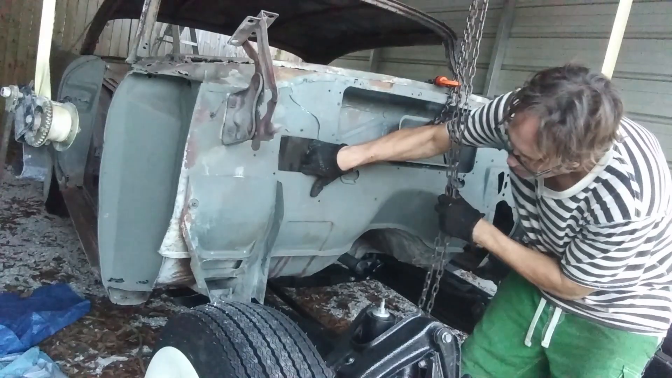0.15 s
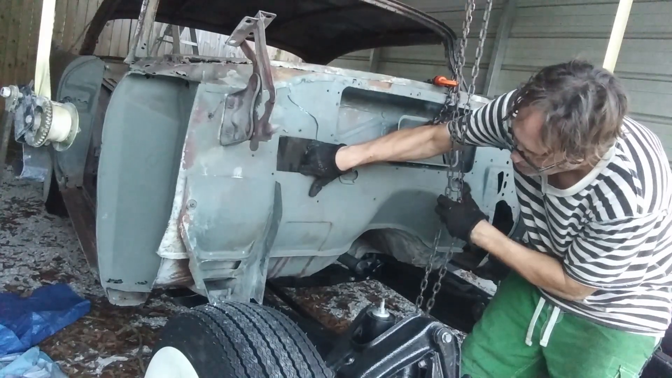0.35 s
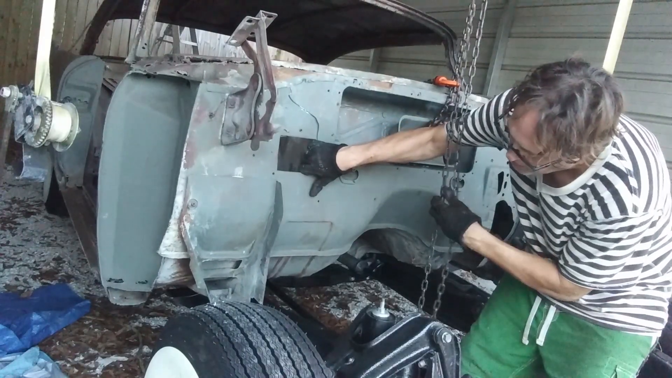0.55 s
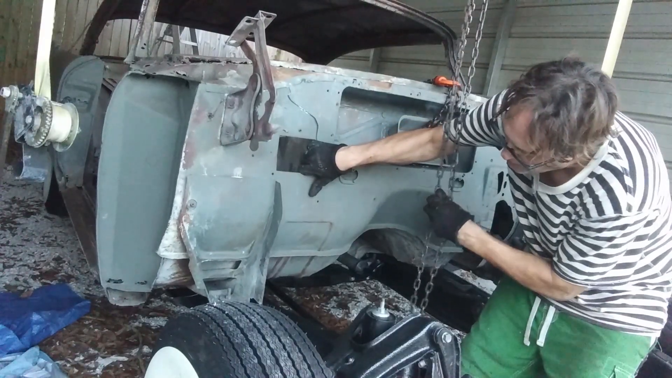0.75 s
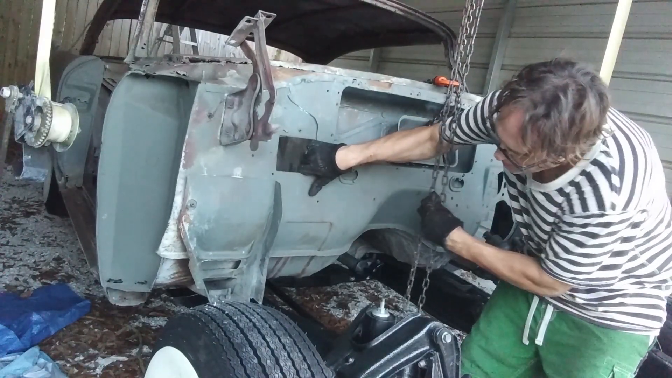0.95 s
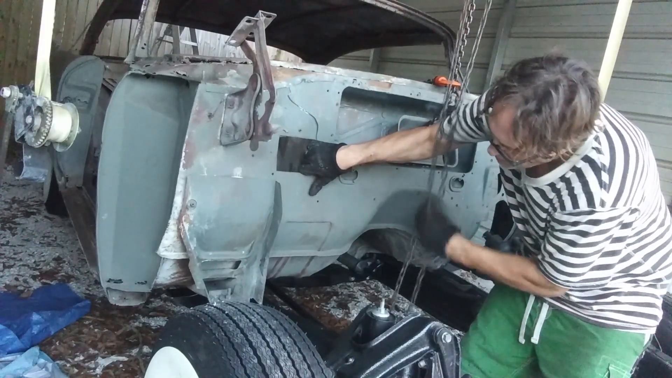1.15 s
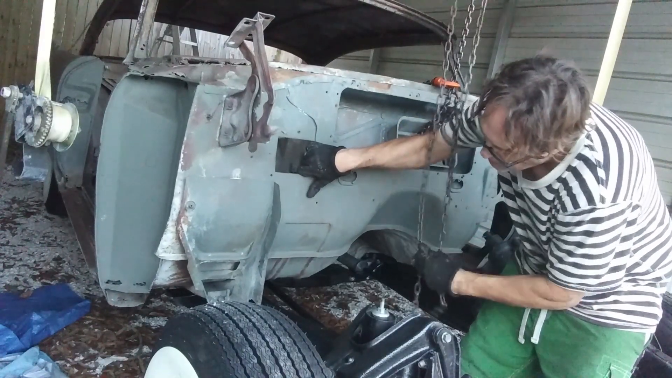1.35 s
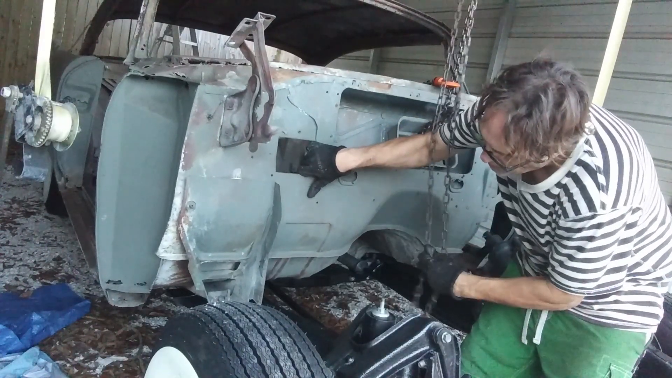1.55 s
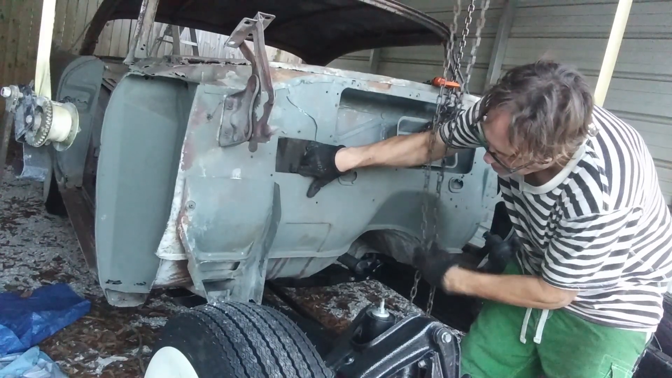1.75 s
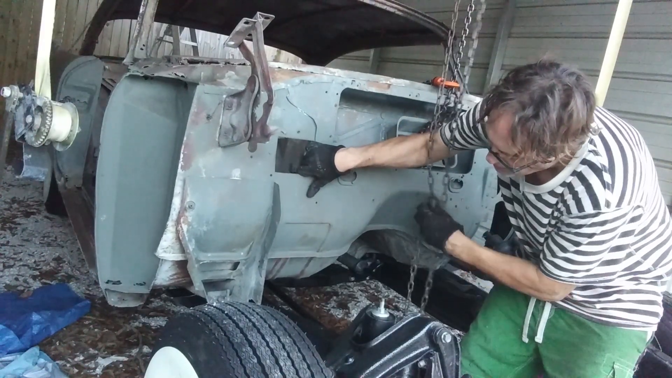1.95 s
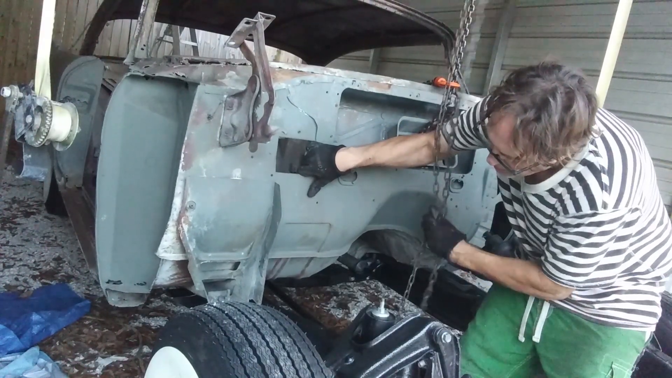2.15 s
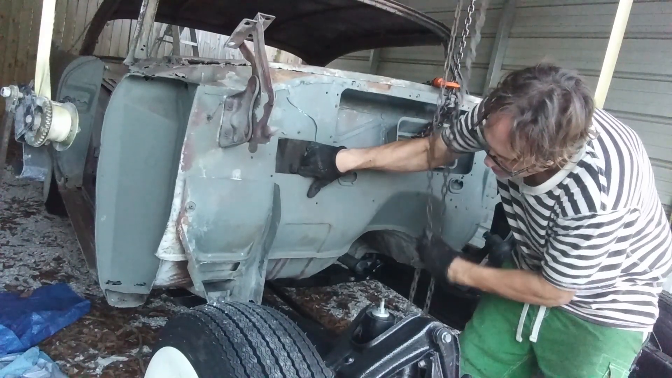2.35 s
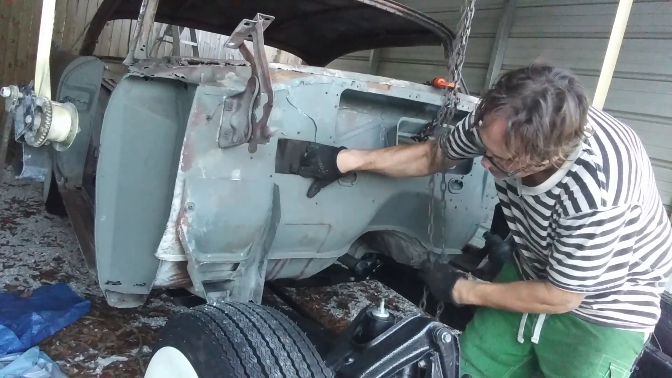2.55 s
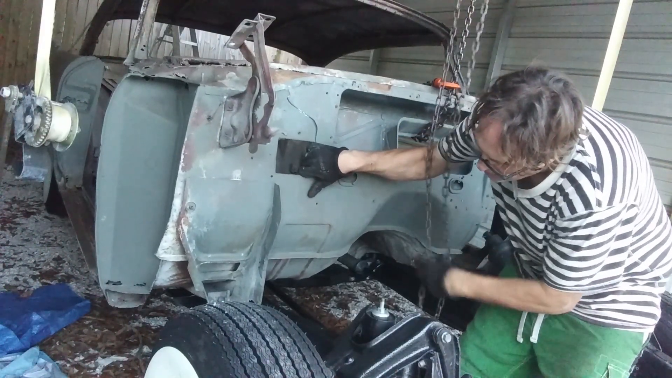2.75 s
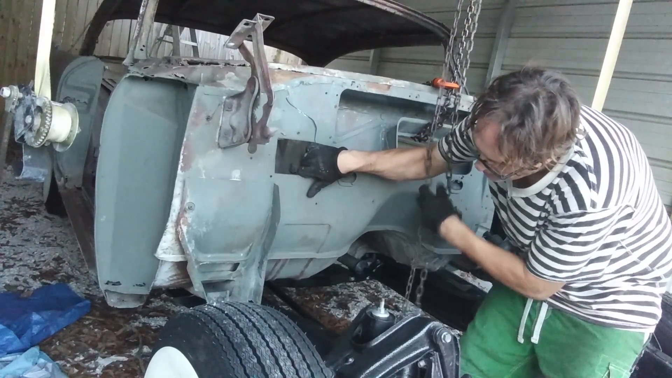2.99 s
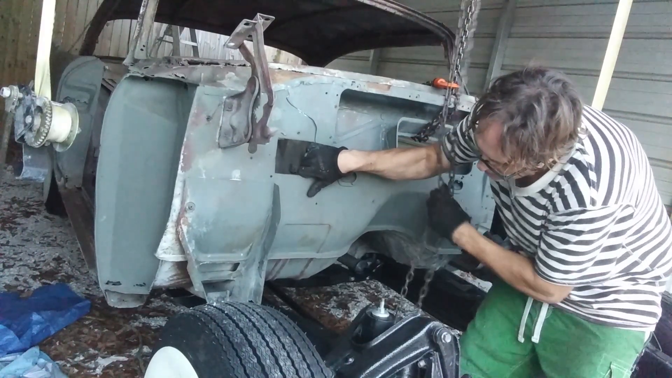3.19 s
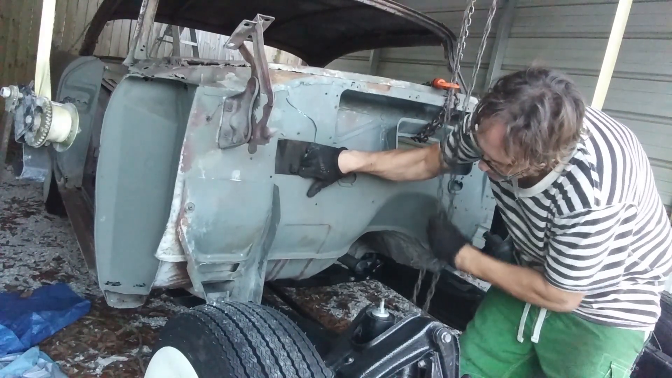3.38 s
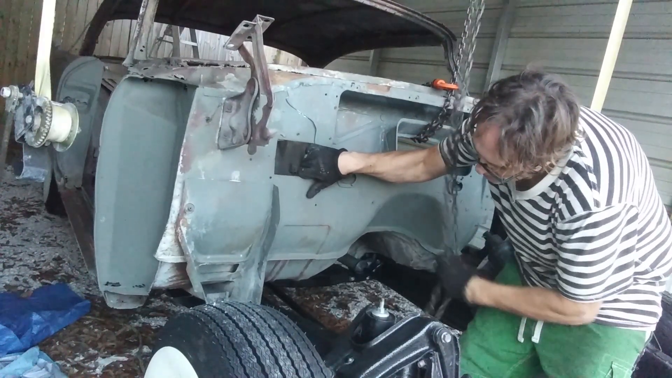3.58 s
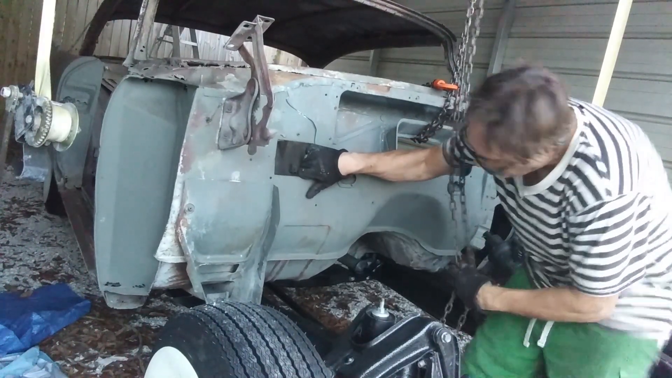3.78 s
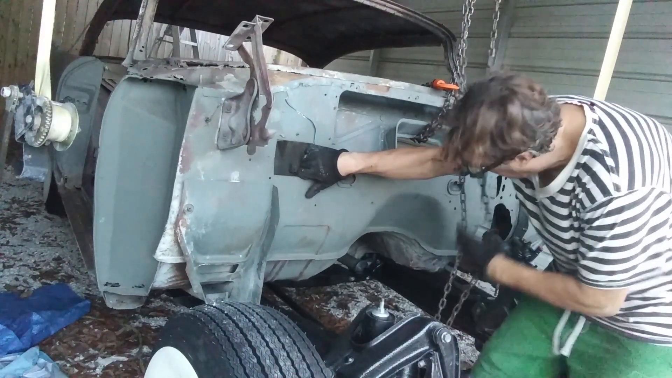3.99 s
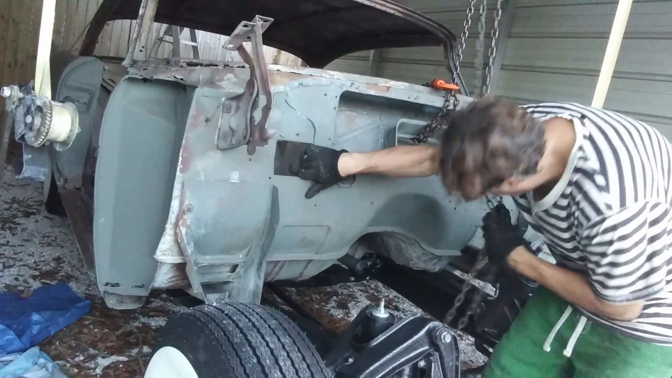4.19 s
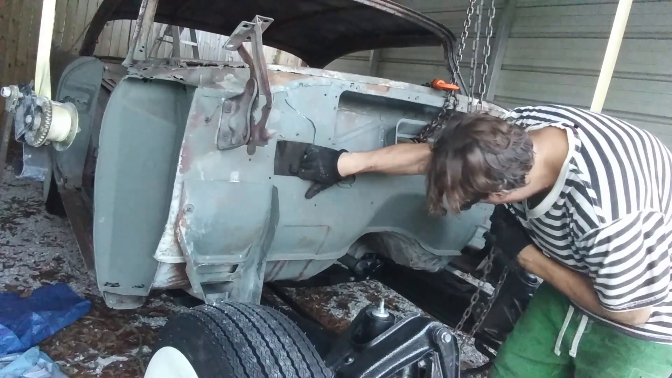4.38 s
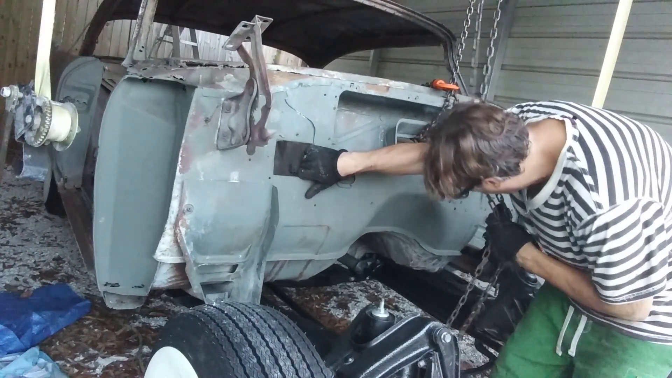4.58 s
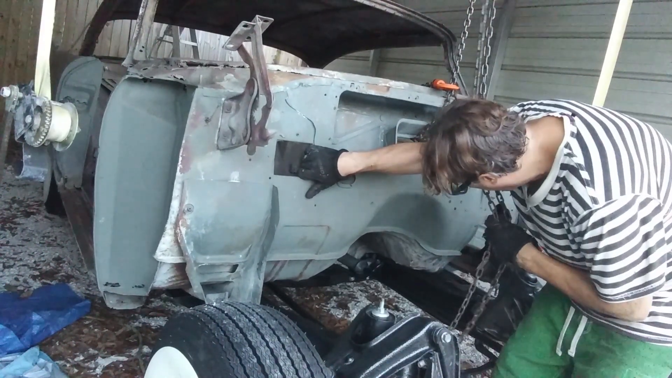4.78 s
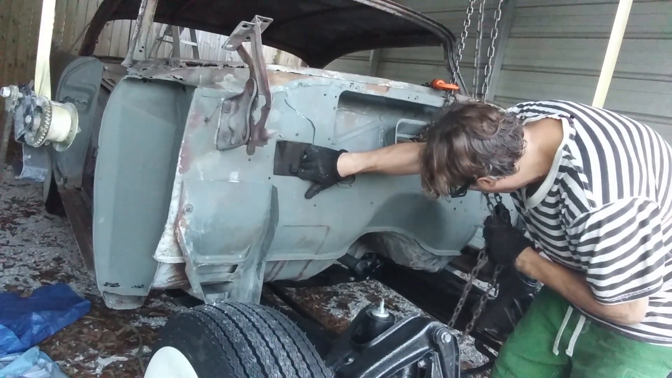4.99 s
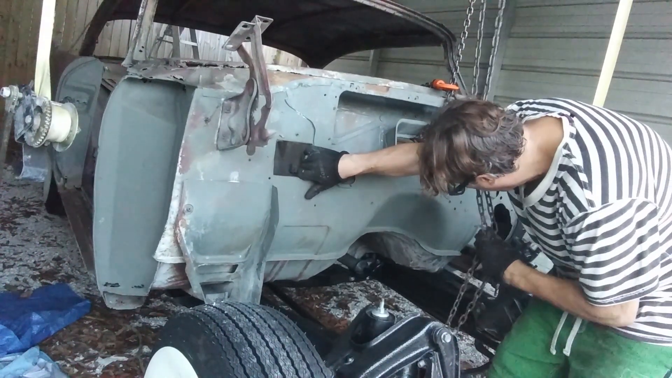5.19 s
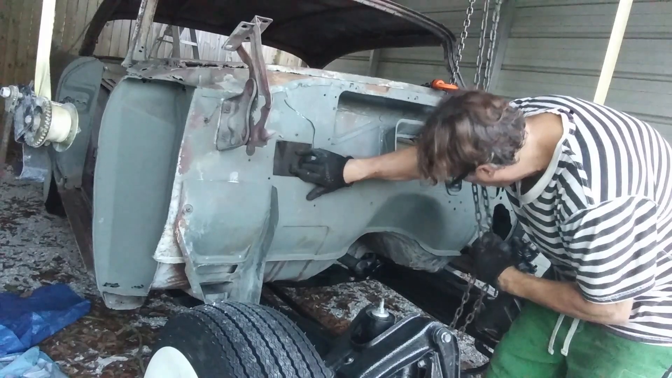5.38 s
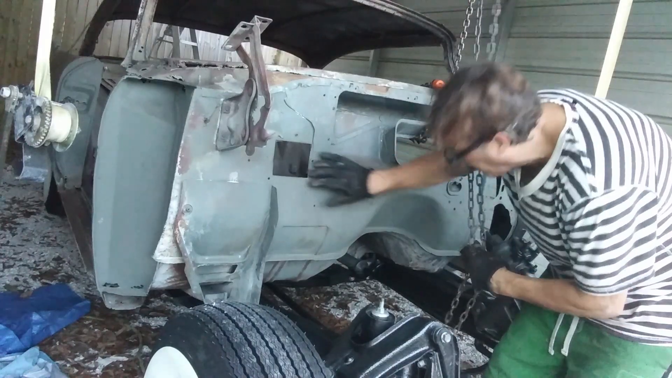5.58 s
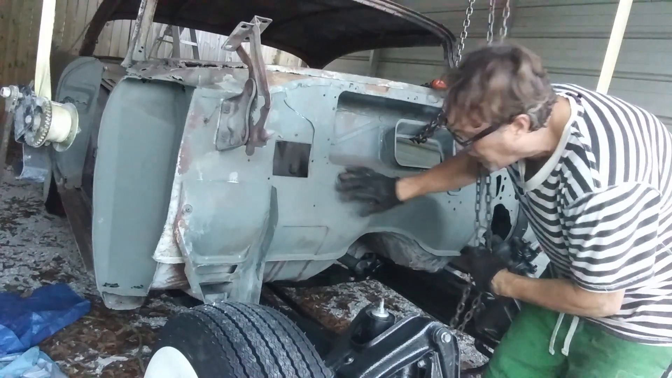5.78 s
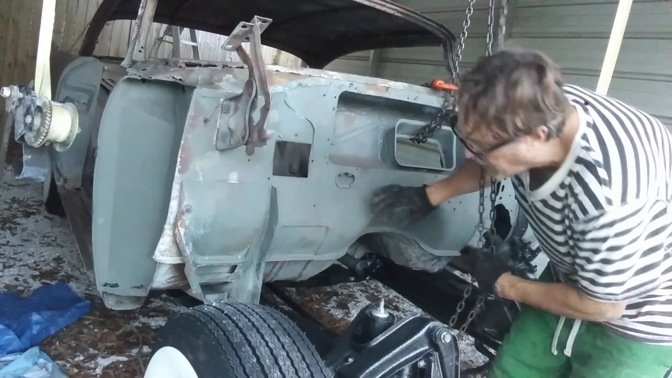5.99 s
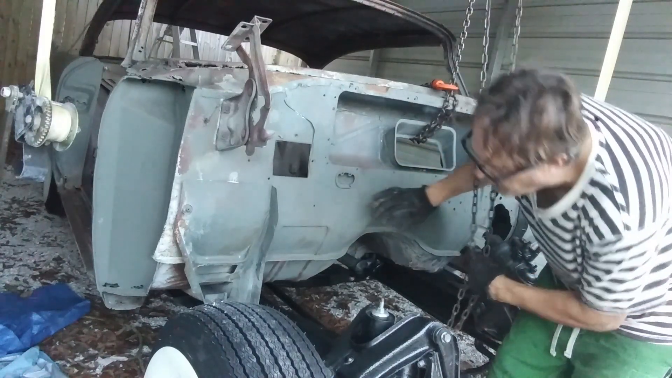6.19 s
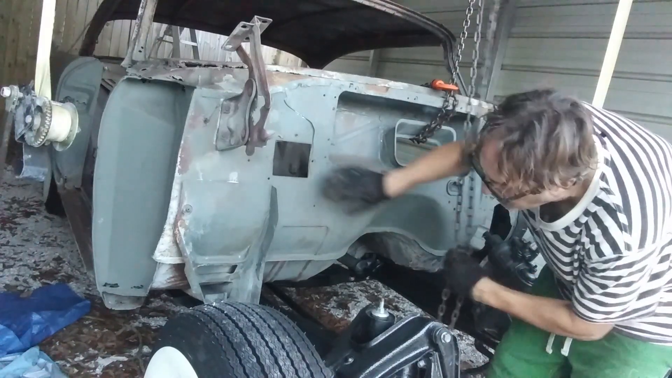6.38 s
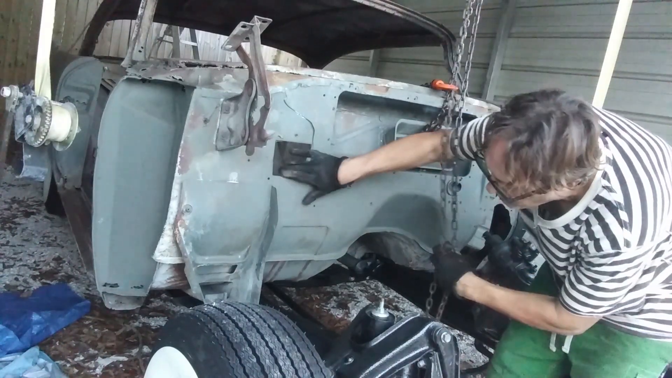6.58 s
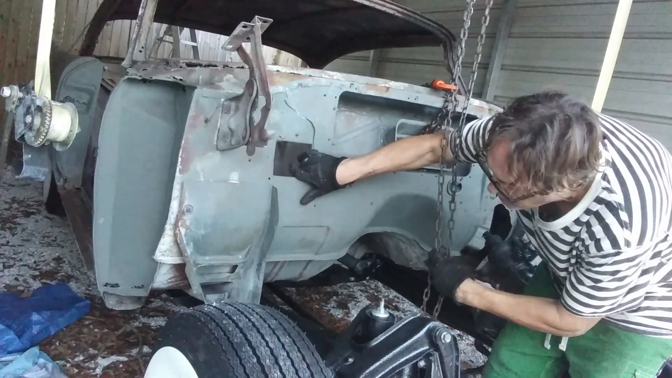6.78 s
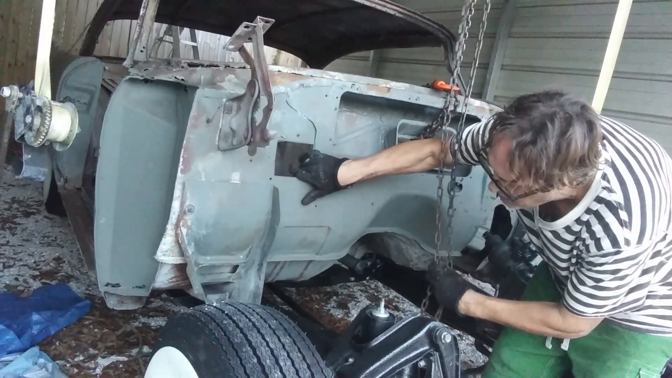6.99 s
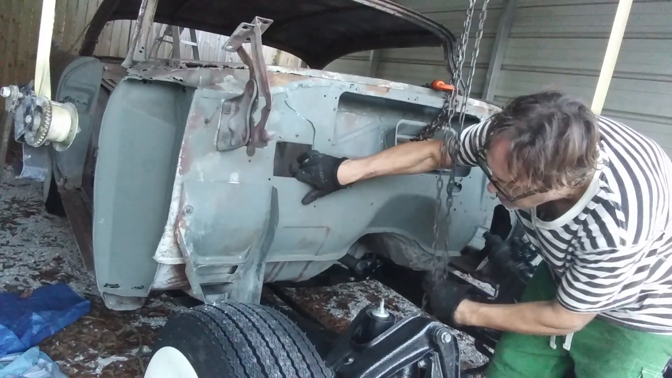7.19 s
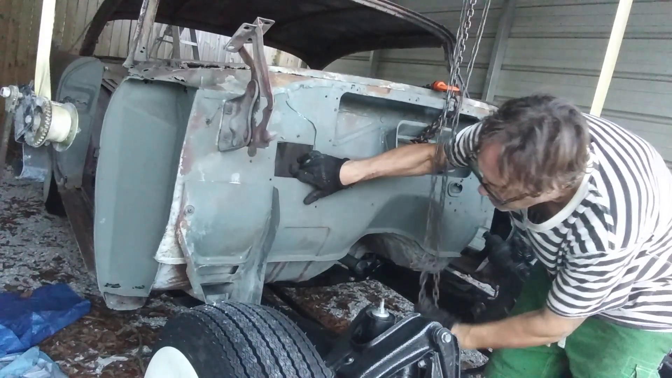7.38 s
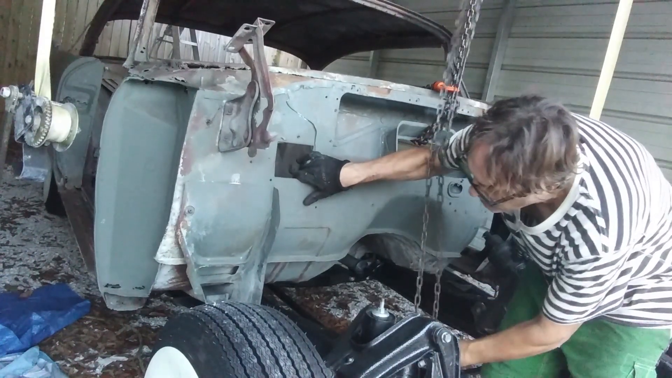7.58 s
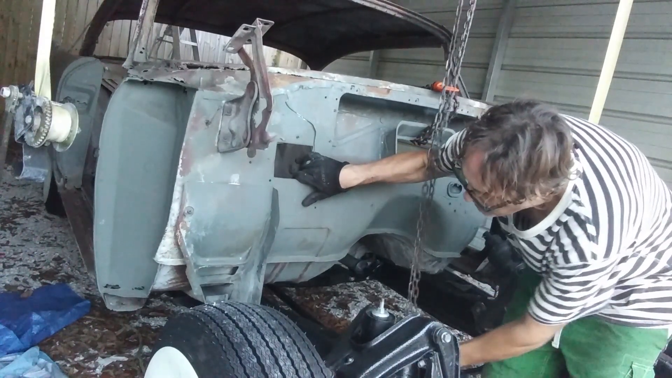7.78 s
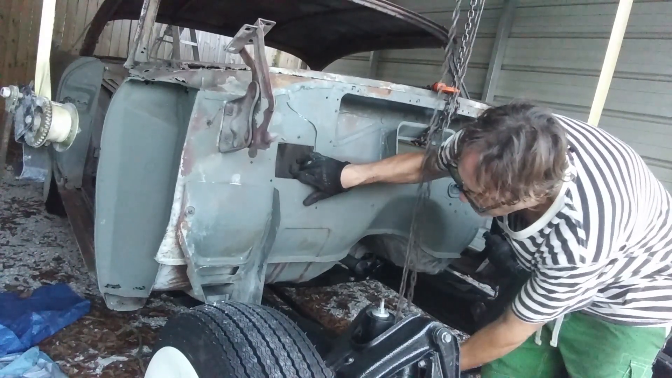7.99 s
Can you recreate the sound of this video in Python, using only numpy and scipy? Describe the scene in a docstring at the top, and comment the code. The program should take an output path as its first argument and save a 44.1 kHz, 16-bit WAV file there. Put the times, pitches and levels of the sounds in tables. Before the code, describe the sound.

Quiet shed noise opens with a faint tick and light scuffs of gloves and slack chain. At about 1.2 s a jerk gives a tight volley of loud, hard steel knocks, ringing and cracking until 1.35, followed by a single clink at 1.5 and soft rubbing. From 2.2 to 2.55 s links rattle faster through the hoist, ending in a stronger knock. Another, denser run clatters from 3.2 to 3.8 s, with bright scuffing and a distinct brush just after 4. Then a lull: dull rubbing, with small isolated clinks around 5.1, 5.4 and 5.75 s. Scuffs and tiny thin pings around 6.6 lead to a renewed rattle, from 6.85 and busiest at 7.3-7.5 s. Lighter clinks and dragging follow, then a sharp knock at 8.0. Everything is close, with short metallic shed echoes and a faint, fluctuating low rumble.

```python
"""Steel chain links knock the wheel housing of a manual hoist or clink on each other, hand-pulled in jerks.
Each knock is a rattle of contacts ringing four steel parts, plus a noise crack; fast runs add a dense clatter.
Slack chain, gloves and shoes scuff as patchy noise; short pings are thin wavering tones.
A sheet-metal shed answers the steel with sparse echoes over a low rumble and steady quiet noise."""
import sys
import numpy as np
from scipy import signal
from scipy.fft import rfft, irfft
from scipy.io import wavfile
from scipy.ndimage import uniform_filter1d

SR = 44100
rng = np.random.default_rng(int(sys.argv[2]) if len(sys.argv) > 2 else 0)


def file_out(sig):
    """Save sig as 16-bit WAV at sys.argv[1]."""
    # one column per channel
    cols = np.atleast_2d(sig).T
    # limit, then scale
    lim = np.clip(cols, -1, 1)
    pcm = np.round(lim * 32767).astype(np.int16)
    wavfile.write(sys.argv[1], SR, pcm)


N = 355005

# Steady noise of the quiet shed: pitch_hz, relative_level_db
QUIET_SPECTRUM, QUIET_DB = [(12, -63), (20, -31), (93, -44), (172, -11.5), (300, -3.5), (754, 1.5),
                            (942, 8), (1110, 0.5), (1470, -1.5), (3500, -11), (5950, -11), (9830, -22.5),
                            (14500, -20), (15800, -31)], -59
# Low rumble in the shed: time_s, level_db
RUMBLE_LEVEL = [(0.0, -81), (1.03, -84), (1.21, -63), (2.62, -68), (3.03, -79), (3.56, -62.5), (4.8, -83.5),
                (5.83, -73.5), (6.19, -92), (7.51, -61), (7.98, -73), (8.05, -57)]
# Colour of the rumble: pitch_hz, relative_level_db
RUMBLE_SPECTRUM = [(60, -40), (110, -18), (150, -1), (210, 3), (300, -15.5), (500, -39.5)]

# Single blows: time_s, level_db (before RING_DB), then shares housing_db, cover_db, link_db, wheel_db,
# and loudest_hz (the favoured high mode)
KNOCKS = [(0.069, -46, -15, -18, -24, -26, 4850), (0.467, -33.5, -8, -14, -17, -24, 4460),
          (1.187, -3.5, -19, -13.5, -22, -22.5, 3650), (1.193, -1.5, -9, -9.5, -33, -19.5, 5680),
          (1.243, -0.5, -14, -8.5, -38, -16.5, 3400), (1.286, -7, -14, -23, -10, -18, 5120),
          (1.305, -3.5, -23, -13.5, -35, -16.5, 5660), (1.316, -4.5, -27, -21, -34, -20, 3180),
          (1.347, -26, -21, -23, -25, -23, 2560), (1.53, -14, -10.5, -27, -5.5, -31, 4600),
          (1.687, -30.5, -5, -20, -10, -22.5, 5670), (1.935, -35.5, -12, -16, -31, -18.5, 3080),
          (2.055, -36, -9, -19, -12, -34, 4570), (2.186, -19.5, -44, -30, -10, -19, 3560),
          (2.244, -23.5, -6.5, -10, -25, -22.5, 5170), (2.284, -20, -12, -7, -13, -22.5, 2580),
          (2.331, -16, -8, -13, -18, -40, 4340), (2.347, -11.5, -24, -22, -1.5, -28, 4440),
          (2.369, -11.5, -21, -12.5, -31, -18, 4590), (2.387, -11, -17, -30, -16, -20.5, 3200),
          (2.417, -22.5, -14, -12, -19, -23, 3310), (2.472, -14, -17, -19, -3, -27, 4380),
          (2.553, -6.5, -28, -16, -15, -21, 5820), (2.858, -38, -7, -16, -31, -22, 4640),
          (3.012, -36, -16, -8, -38, -19.5, 3060), (3.213, -28.5, -7, -20, -21, -28, 3390),
          (3.227, -21.5, -12.5, -24, -7.5, -27, 4770), (3.311, -28, -18, -13, -29, -24, 4690),
          (3.325, -10, -19, -8.5, -13, -18, 4470), (3.339, -9.5, -11, -22, -25, -19, 5160),
          (3.403, -13, -9.5, -19, -6, -22.5, 4320), (3.427, -6, -15, -13.5, -30, -18.5, 4500),
          (3.443, -6, -9, -14, -34, -19.5, 3470), (3.482, -16, -24, -12, -3.5, -32, 4370),
          (3.523, -9, -10, -10.5, -14, -19, 4390), (3.559, -14.5, -8, -19, -18, -17, 3130),
          (3.589, -17.5, -24, -23, -1.5, -30, 4510), (3.617, -12, -19, -20, -31, -17, 4140),
          (3.625, -8, -13, -14, -31, -19.5, 5680), (3.656, -14, -18, -5.5, -31, -21.5, 2550),
          (3.69, -23, -11, -14, -14, -34, 3100), (3.708, -13.5, -23, -59, -4.5, -43, 4450),
          (3.781, -19.5, -6.5, -6.5, -25, -43, 2510), (4.935, -37.5, -4.5, -15.5, -29, -20.5, 5300),
          (5.11, -17, -13.5, -10.5, -36, -18, 5670), (5.228, -37, -7, -22, -22.5, -29.5, 2630),
          (5.366, -27, -7, -14, -26, -31, 2610), (5.421, -19, -26, -14.5, -8.5, -26, 4470),
          (5.747, -20.5, -10.5, -18.5, -5, -22, 4000), (5.909, -32, -7.5, -16, -18, -36, 3070),
          (6.362, -37, -11.5, -11, -26, -28, 2650), (6.71, -25, -8.5, -30, -18.5, -29.5, 5750),
          (6.868, -25.5, -13.5, -19, -27, -33, 2460), (6.932, -16.5, -14, -18, -4.5, -29, 4460),
          (7.023, -14, -19, -11.5, -11, -17.5, 5700), (7.037, -11, -19, -19, -10, -21, 4050),
          (7.185, -29, -5.5, -12.5, -32, -38, 5640), (7.246, -16, -16.5, -24, -6, -22.5, 4560),
          (7.305, -8.5, -10, -11, -10, -17.5, 5650), (7.31, -8, -26, -21, -13.5, -18, 4320),
          (7.38, -18.5, -24, -19, 0, -33, 4390), (7.401, -5, -12, -10.5, -36, -19, 5780),
          (7.437, -10, -12, -15, -20, -24.5, 2590), (7.48, -15, -32, -21, -4, -26, 4500),
          (7.51, -9.5, -13.5, -9.5, -14, -18.5, 4310), (7.645, -26.5, -17, -25, -6, -31, 4470),
          (7.745, -30, -13, -18.5, -17, -31, 4640), (7.766, -22, -16, -22, -11.5, -22.5, 4270),
          (7.834, -23.5, -17, -10.5, -19, -21, 5680), (7.911, -28.5, -5.5, -6.5, -30, -34, 2550),
          (7.958, -31.5, -11, -3, -9, -22, 2550), (7.984, -19.5, -24, -13, 0, -20.5, 4200),
          (8.014, -5.5, -24, -9, -26, -17.5, 5680)]
RING_DB = -6
RATTLE_MS, CLINK_MS = 2.99, 1.95  # a blow on the wheel rattles longer than link on link
LINK_SPREAD = .012  # no two links ring at quite the same pitch (share of the pitch)
PLATES_DB, CRACK_DB = 6, 10.5  # what a blow on the wheel gives to side plates and crack
# Modes of the wheel housing: pitch_hz, relative_level_db, t60_s (before damping)
HOUSING_MODES = [(637, -47, 0.18), (710, -41, 0.21), (831, 2, 0.75), (845, 7, 0.78), (960, 4, 0.63),
                 (1002, 4.5, 0.081), (1048.6, 14, 0.057), (1083, 4.5, 0.037), (1067, -5, 0.12)]
# Modes of the cover: pitch_hz, relative_level_db, t60_s (before damping)
COVER_MODES = [(1337, -28, 0.056), (1500, -29, 0.055), (1519, 18, 0.15), (1486, 5, 0.15), (1565, 18, 0.067),
               (1560, -3, 0.068), (1730, -38, .05)]
# Modes of the side plates: pitch_hz, relative_level_db, t60_s (before damping)
PLATE_MODES = [(2020, -33, 0.076), (2556, 4, 0.15), (2917, -13, 0.081), (3081, 4.5, 0.18), (3220, 4, 0.025),
               (3406, 2, 0.11), (4100, 7.5, 0.082), (5670, 3.5, 0.08), (6500, -18, 0.043), (7000, -31, .04),
               (7500, -15.5, 0.033), (9400, -18, 0.027), (9840, -25, .04), (11300, -21, 0.033),
               (14300, -24.5, .03)]
# Modes of a chain link: pitch_hz (before the spread), relative_level_db, t60_s (before damping)
LINK_MODES = [(4460, 11, 0.08), (4390, 2.5, 0.1), (4420, -17, 0.02), (4521, 1, 0.04), (5040, -2, 0.071),
              (5250, 0.5, 0.11)]
# Colour of the noise crack: pitch_hz, relative_level_db
CRACK_SPECTRUM = [(150, -47), (500, -34), (900, 8.5), (1600, -3.5), (2300, -5.5), (4500, -1), (7000, -4),
                  (10000, -13), (12500, -17), (16000, -27.5)]
# Bass cut on the hoist's sounds: pitch_hz, gain_db
NEAR_BASS_CUT = [(30, -54.5), (150, -35), (550, -2)]

# Echo decay of the shed: pitch_hz, t60_s
SHED_DECAY, SHED_DB = [(150, 1), (600, 0.3), (1700, 0.33), (4500, 0.26), (12000, 0.22)], -1.5

# Faint single pings: start_s, level_db (before the fades), pitch_hz, length_s
PINGS = [(0.25, -65, 13300, 0.052), (.72, -58, 13300, 0.017), (1.93, -60, 13700, 0.1),
         (.07, -45, 2020, 0.025), (.39, -53, 310, .1), (6.66, -48, 330, 0.19), (6.592, -41.5, 560, .07),
         (6.705, -37.5, 1210, 0.057)]

# Scuffs: loudest_s, rise_s and fade_s (time for 20 dB; tiny or negative ones are floored in swell),
# low_db, dull_db, bright_db
SCUFFS = [(.075, 0.02, .2, -63, -54.5, -57.5), (.15, .03, 0.2, -59, -58, -62),
          (.272, 0.022, 0.4, -59.5, -56, -63.5), (.39, .02, 1, -55, -60, -62),
          (.486, .03, 0.4, -67, -48.5, -52.5), (1.087, 0.015, 0, -49, -42.5, -43.5),
          (1.15, 0.072, 0.16, -53, -37.5, -42), (1.36, 0.075, 1, -41, -42, -43.5),
          (1.526, .03, -0.02, -47, -32.5, -40.5), (1.688, 0.019, 0.4, -61, -45, -56),
          (1.948, 0.02, 0.2, -45.5, -47.5, -56.5), (2.14, .08, 2.9, -57, -57, -56.5),
          (2.36, 0.13, 0.33, -48, -40, -65), (2.662, 0.13, .15, -47.5, -40, -55),
          (2.868, 0.05, 0.35, -56.5, -58, -57.5), (3.016, 0.015, 0.5, -65.5, -51.5, -68),
          (3.11, 0.21, 0, -62, -56.5, -54.5), (3.52, 0.28, 0.38, -64.5, -58, -38.5),
          (3.82, 0.3, 0.28, -43.5, -40, -45), (4.002, .04, -0.06, -56, -59, -43.5),
          (4.063, 0.066, 0.07, -40, -30.5, -32.5), (4.15, 0.11, 0.3, -52, -58, -45),
          (4.33, 0.36, 0.22, -54, -47.5, -52.5), (4.46, 0.017, 0.13, -61, -57.5, -60.5),
          (4.679, 0.035, -1.3, -70.5, -50, -59.5), (4.938, 0.018, 0.6, -60, -54, -55),
          (5.081, .012, 0.3, -66, -44, -55.5), (5.2, .08, 1.5, -55, -54, -58.5),
          (5.374, 0.046, 0.25, -46, -44, -48), (5.52, 0.31, .15, -46.5, -43, -49),
          (5.6, 0.18, .07, -46, -45.5, -51.5), (5.72, 0.067, 0, -50.5, -48.5, -53.5),
          (5.921, 0.013, -0.15, -69, -44, -75.5), (5.985, 0.068, 0.16, -62, -50, -52.5),
          (6.228, 0.036, .15, -68, -54, -59.5), (6.363, 0.011, -1.2, -79.5, -47, -80),
          (6.59, 0.048, 0.35, -51.5, -48.5, -50), (6.64, 0.048, 0.13, -52.5, -46, -49.5),
          (6.726, 0.18, 0.17, -42, -43.5, -69), (6.915, 0.094, 0.6, -50.5, -44, -53.5),
          (7.22, .08, 1.5, -57, -46, -63), (7.31, 0.13, 0.4, -56, -54, -43),
          (7.56, 0.3, 0.7, -44, -51, -67), (7.778, 0.18, 1, -52, -44, -51), (8.04, 0.22, -2, -56, -60, -62)]
# Colour of the low scuff: pitch_hz, relative_level_db
LOW_SPECTRUM = [(70, -68), (130, -33), (180, -18), (330, 0.5), (550, 2.5), (750, 8), (1100, -52)]
# Colour of the dull scuff: pitch_hz, relative_level_db
DULL_SPECTRUM = [(300, -41), (550, -20.5), (800, -2), (1300, -3.5), (2000, -9), (3000, -12), (5000, -45)]
# Colour of the bright scuff: pitch_hz, relative_level_db
BRIGHT_SPECTRUM = [(1060, -44), (1800, -6), (2280, -11), (3600, -9), (3910, -6), (6950, -7.5),
                   (8480, -15.5), (15500, -28)]
# Bass cut on the low and dull scuff: pitch_hz, gain_db
SCUFF_BASS_CUT = [(50, -19), (110, -12), (170, -2)]

# Runs of links round the wheel: start_s, fastest_s, end_s, clatter_db
# (an end before the fastest moment cuts the run off while it still rises)
PULLS = [(1.203, 1.261, 1.23, -29), (1.3, 1.42, 1.48, -39), (2.185, 2.355, 2.38, -33.5),
         (2.4, 2.6, 2.66, -36.5), (3.24, 3.452, 3.3, -30), (3.45, 3.672, 3.92, -35.5),
         (6.83, 6.942, 6.97, -44.5), (7.14, 7.39, 7.75, -32.5), (7.752, 8.047, 8.3, -37.5)]
SLACK_DB = -21.5  # clatter at both ends of a run, relative to its fastest

EDGE_HZ = 16000  # upper band limit


def gain_of(db):
    """Decibels to a factor."""
    return 10 ** (np.asarray(db) / 20)


def evened(x):
    """Scales to an rms of one."""
    return x / np.sqrt(np.mean(x ** 2) + 1e-20)


def read(points, hz):
    """Reads a table along log frequency."""
    f, value = np.transpose(points)
    return np.interp(np.log(hz + 1), np.log(f + 1), value)


def add(mix, s, sound):
    """Mixes a sound in at a time."""
    part = mix[round(s * SR):][:len(sound)]
    part += sound[:len(part)]


def coloured(x, spectrum):
    """Filters by a spectrum table."""
    hz = np.fft.rfftfreq(len(x), 1 / SR)
    return irfft(rfft(x) * gain_of(read(spectrum, hz)), len(x))


def quiet_shed():
    """Steady coloured noise, the quiet of the shed."""
    return gain_of(QUIET_DB) * evened(coloured(rng.standard_normal(N), QUIET_SPECTRUM))


def rumble():
    """A soft low noise band that swells and sinks."""
    noise = evened(coloured(rng.standard_normal(N), RUMBLE_SPECTRUM))
    level_db = np.interp(np.arange(N) / SR, *np.transpose(RUMBLE_LEVEL))
    return noise * gain_of(level_db)


def rings(modes, t):
    """One dying sine a row."""
    hz, db, t60 = np.transpose(modes)[:, :, None]
    return gain_of(db - 60 * t / np.maximum(t60, .01)) * np.sin(2 * np.pi * hz * t)


def steel(link_tune=1):
    """The modes of housing, cover, side plates and link as dying sines; touching parts damp every ring."""
    t = np.arange(4096) / SR
    parts = HOUSING_MODES, COVER_MODES, PLATE_MODES, np.array(LINK_MODES) * (link_tune, 1, 1)
    damping_t60_s = .3, .25, .1, .15
    return [rings(modes, t) * gain_of(-60 * t / t60) for modes, t60 in zip(parts, damping_t60_s)]


def lift_near(modes, loudest_hz, lift_db):
    """Decibels of boost for the modes close to one pitch."""
    return lift_db * np.exp(-((np.transpose(modes)[0] / loudest_hz - 1) / 0.04) ** 2)


def struck(parts, shares_db, chance, loudest_hz):
    """The ring of one contact: the struck spot favours some modes, above all high ones near loudest_hz."""
    lifts_db = [0, 0, lift_near(PLATE_MODES, loudest_hz, 10.5), lift_near(LINK_MODES, loudest_hz, 2.1)]
    ring = 0
    for k, share_db in enumerate(shares_db):
        spot_db = 3.5 * chance[20 * k:20 * k + len(parts[k])] + lifts_db[k]
        part = gain_of(spot_db) @ parts[k]
        # the first 600 samples set the loudness
        ring = ring + gain_of(share_db) * part / np.sqrt(np.mean(part[:600] ** 2))
    return ring


def rattle(t, length_ms):
    """A short burst of uneven contacts."""
    u = t / (length_ms / 1000)
    noise = rng.standard_normal(len(t))
    contacts = noise * abs(noise) * u * np.exp(-u)
    # a flat spectrum: every mode gets about the same push
    contacts = irfft(np.exp(1j * np.angle(rfft(contacts))))
    return contacts * np.exp(-(u / 8) ** 2)


def crack(contacts, t):
    """Countless close modes blur into a short splash of noise."""
    power = signal.fftconvolve(contacts ** 2, gain_of(-120 * t / 0.032))[:len(t)]  # t60 of 0.032 s
    splash = rng.standard_normal(len(t)) * np.sqrt(abs(power))
    splash = coloured(splash, CRACK_SPECTRUM) * np.minimum(t / 0.0013, 1)
    return splash / np.sqrt(np.mean(splash[:600] ** 2))


def knocks():
    """Each blow is a short rattle of contacts that rings four steel parts and cracks."""
    t, out = np.arange(4096) / SR, np.zeros(N)
    for s, blow_db, housing_db, cover_db, link_db, wheel_db, loudest_hz in KNOCKS:
        link_on_link = link_db > wheel_db + 10
        contacts = rattle(t, CLINK_MS if link_on_link else RATTLE_MS)
        parts = steel(1 + LINK_SPREAD * rng.standard_normal())
        shares_db = housing_db, cover_db, wheel_db + PLATES_DB, link_db
        ring = struck(parts, shares_db, rng.standard_normal(80), loudest_hz)
        sound = signal.fftconvolve(contacts, ring)
        sound[:len(t)] += gain_of(wheel_db + CRACK_DB) * crack(contacts, t)
        add(out, s - .001, gain_of(blow_db + RING_DB) * sound)  # the rattle needs a moment to build
    return out


def shed(x):
    """Sparse echoes of random sign, each band dying at its own speed; three tails take turns."""
    size = SR * 3 // 4
    taps = np.zeros((3, size))
    places = np.arange(160, size - 20, 16)
    at = places + rng.integers(0, 16, (3, len(places)))
    np.put_along_axis(taps, at, rng.choice([-1., 1.], at.shape), 1)
    hz, t, z = signal.stft(taps, SR, nperseg=256)
    decay = gain_of(-60 * t / read(SHED_DECAY, hz)[:, None])
    tails = signal.istft(z * decay, SR, nperseg=256)[1]
    tails /= np.linalg.norm(tails, axis=1, keepdims=True)
    turn = np.arange(N) / SR * 9 + np.arange(3)[:, None] * np.pi / 3
    feeds = x * np.cos(turn) * np.sqrt(2 / 3)  # total power stays even
    return signal.fftconvolve(feeds, tails, axes=1).sum(0)[:N]


def pings():
    """Short thin tones that waver in strength."""
    out = np.zeros(N)
    for s, db, hz, length in PINGS:
        t = np.arange(0, length, 1 / SR)
        waver = 1 + 0.25 * evened(uniform_filter1d(rng.standard_normal(len(t)), size=300))
        fades = signal.windows.tukey(len(t), .3) * np.exp(-t / length)
        add(out, s, gain_of(db) * waver * np.sin(2 * np.pi * hz * t) * fades)
    return out


def swell(t, top, rise, fade):
    """Twenty decibels up over the rise, twenty down over the fade."""
    return -20 * np.maximum((top - t) / max(rise, .003), (t - top) / max(fade, .01))


def rustle(spectrum, level_db, patchy_db, grain_db):
    """Noise in drifting patches of time and pitch, roughened by tiny grains."""
    frames, hz = N // 128 + 5, np.fft.rfftfreq(512, 1 / SR)
    real, imaginary, patches = rng.standard_normal((frames, 257, 3)).T
    patches = uniform_filter1d(patches, size=7, axis=0)  # across pitch
    patches = evened(uniform_filter1d(patches, size=14, axis=1))  # across time
    grains = evened(uniform_filter1d(rng.standard_normal(frames), size=3))
    shape_db = read(spectrum, hz)[:, None] + patchy_db * patches + grain_db * grains
    z = (real + 1j * imaginary) * gain_of(shape_db)
    noise = signal.istft(z, nperseg=512, noverlap=384)[1][:N]
    return gain_of(level_db) * evened(noise)


def scuffing():
    """Slack chain, gloves and shoes dragging: a low, a dull and a bright part."""
    steps = np.arange(0, N + 64, 64) / SR
    power = 0  # overlapping scuffs add in power, one row a part
    for top, rise, fade, *parts_db in SCUFFS:
        power = power + gain_of(np.c_[parts_db] + swell(steps, top, rise, fade)) ** 2
    t = np.arange(N) / SR
    low_db, dull_db, bright_db = (np.interp(t, steps, 10 * np.log10(p + 1e-12)) for p in power)
    low = rustle(LOW_SPECTRUM, low_db, patchy_db=3.5, grain_db=-1.5)
    dull = rustle(DULL_SPECTRUM, dull_db, patchy_db=2.0, grain_db=0.8)
    bright = rustle(BRIGHT_SPECTRUM, bright_db, patchy_db=-0.35, grain_db=1.5)
    return coloured(low + dull, SCUFF_BASS_CUT) + bright


def clatter():
    """Dense small contacts of uneven size, each ringing one of a dozen spots on the steel."""
    parts, t = steel(), np.arange(N) / SR
    happens = rng.random(N) < 600 / SR  # about 600 contacts a second
    size = gain_of(4.7 * np.minimum(rng.exponential(1, N), 3.2)) * happens
    spot, chance = rng.integers(0, 12, N), rng.standard_normal((12, 80))
    ringing = np.zeros(N)
    for k in range(12):
        ring = struck(parts, (-0.5, 0.5, 3.5, -1.0), chance[k], PLATE_MODES[k][0])
        ringing += signal.oaconvolve(size * (spot == k), ring)[:N]
    splash = uniform_filter1d(size, size=90) * rng.standard_normal(N)
    splash = evened(coloured(splash, CRACK_SPECTRUM))
    sound = evened(evened(ringing) + gain_of(-7.5) * splash)
    # -90 dB below the run's level outside it; the loudest run wins
    levels = [gain_of(db + np.interp(t, run, (SLACK_DB, 0, SLACK_DB), -90, -90)) for *run, db in PULLS]
    return sound * np.max(levels, axis=0)


def scene():
    """Hoist and its echoes in the shed, scuffing, rumble and quiet."""
    near = coloured(knocks() + pings() + clatter(), NEAR_BASS_CUT)
    echoes = gain_of(SHED_DB) * shed(near)
    return (near + echoes + scuffing() + rumble() + quiet_shed())[None]


def record(dry):
    """The input stage rounds off the loudest peaks; then the band limit."""
    soft = np.tanh(dry)
    lowpass = signal.firwin(301, EDGE_HZ, window=("kaiser", 9), fs=SR)
    return signal.oaconvolve(soft, lowpass[None], "same")


dry = scene()
out = record(dry)
file_out(out)
```